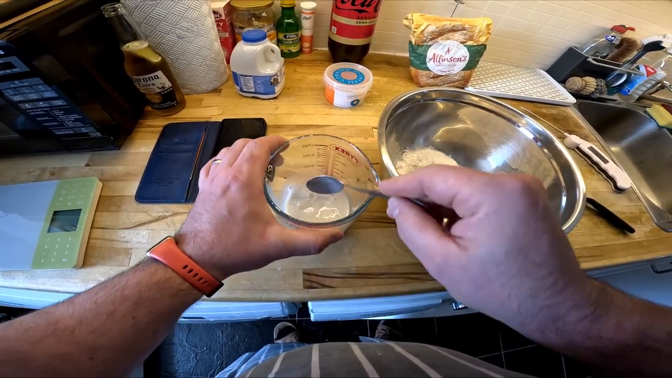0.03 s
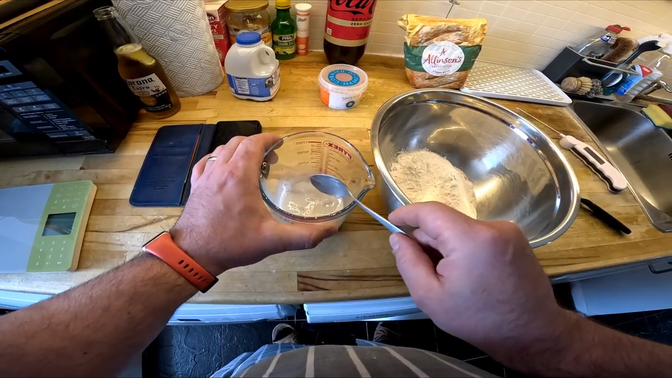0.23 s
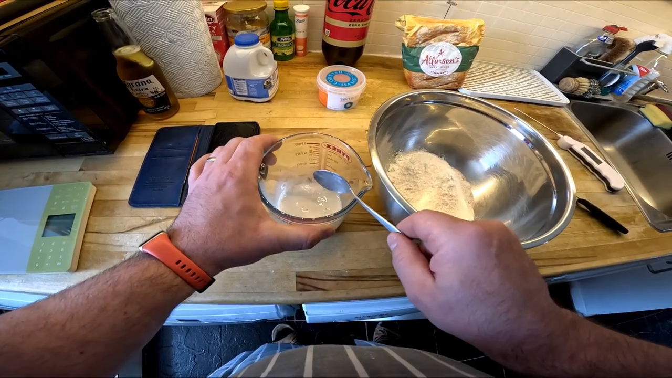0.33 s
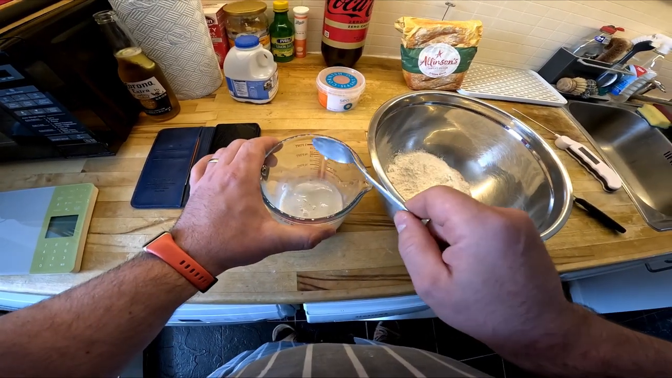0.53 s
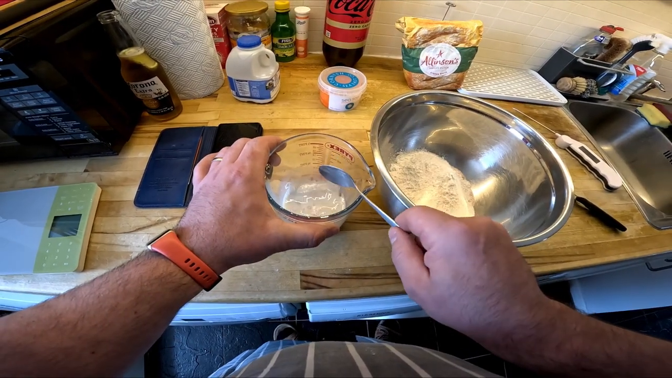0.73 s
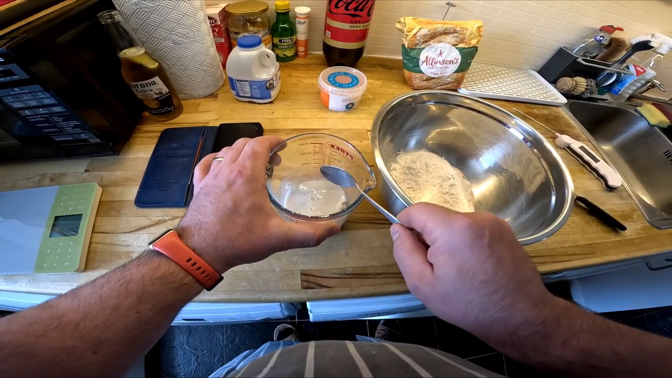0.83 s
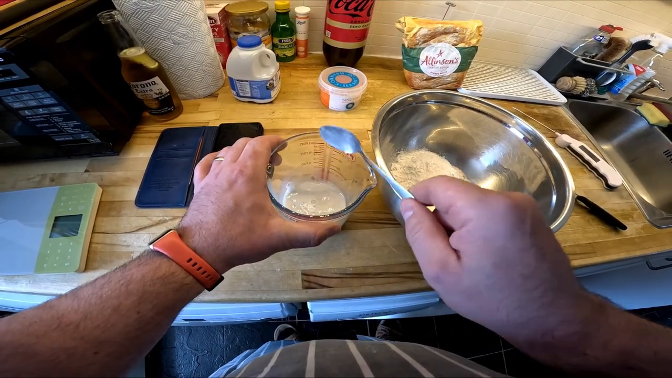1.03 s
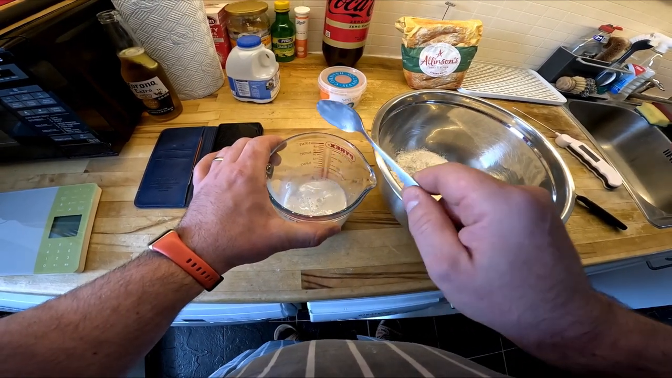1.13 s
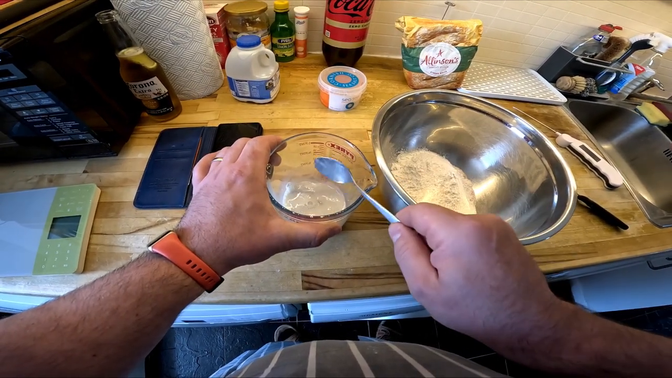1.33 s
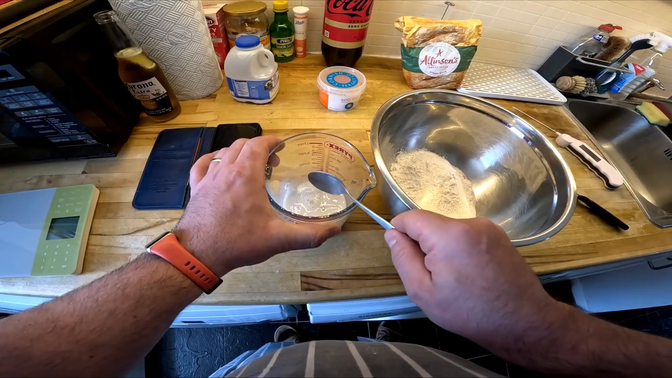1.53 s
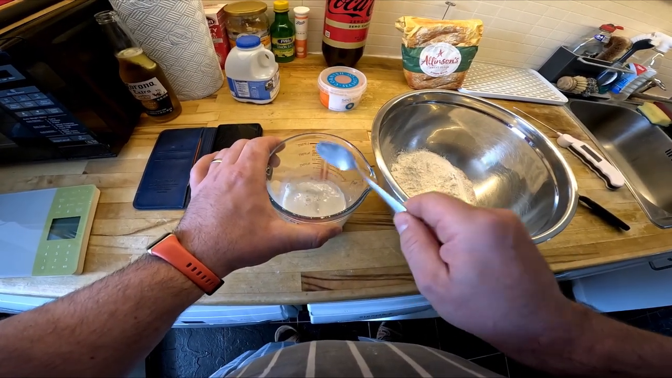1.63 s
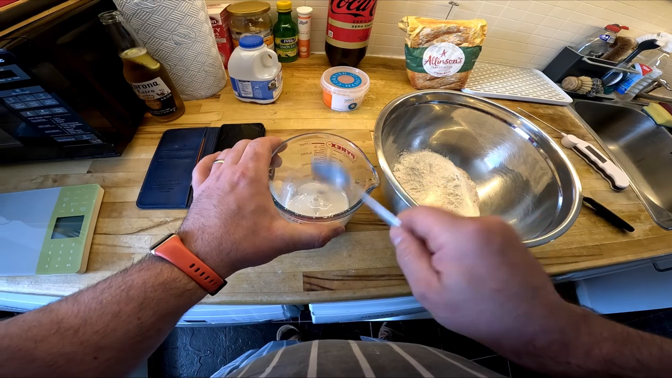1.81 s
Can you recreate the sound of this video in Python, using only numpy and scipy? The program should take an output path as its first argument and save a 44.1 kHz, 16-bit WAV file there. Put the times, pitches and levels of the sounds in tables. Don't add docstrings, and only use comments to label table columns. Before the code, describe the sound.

A steel spoon clinks against a handheld glass jug: one knock on the wall, a pause, a hard rim knock, then three quicker, softer taps, with dull counter thuds in a small kitchen, heard close.

```python
import sys
import numpy as np
from scipy import signal
from scipy.fft import rfft, irfft
from scipy.io import wavfile
from scipy.ndimage import uniform_filter1d

SR = 44100
rng = np.random.default_rng(int(sys.argv[2]) if len(sys.argv) > 2 else 0)


def put_to_file(sound):
    columns = np.atleast_2d(sound).T
    safe = np.clip(columns, -1, 1)
    whole_steps = np.round(safe * 32767)
    wavfile.write(sys.argv[1], SR, whole_steps.astype(np.int16))


def magnitude_from_level(level_db):
    exponent = np.asarray(level_db, float) / 20
    return 10 ** exponent


N = 83790

# (frequency [Hz], level [dB per Hz])
AIR_COLOUR = [(110, -32), (180, -4), (490, -12), (650, -23), (1120, -16.5), (4200, -34), (6300, -29.5),
              (9000, -45)]
RUSTLE_COLOUR = [(120, -37), (200, 5), (280, -21.5), (347, -9.5), (561, -30.5), (759, -18.5), (5170, -38.5),
                 (14000, -52)]
RUMBLE_COLOUR = [(15, -11), (35, -5), (50, -1), (62, -20.5), (100, -15.5), (300, -60)]
AIR_DB, RUSTLE_DB, RUMBLE_DB = -69, -57, -60
RUSTLE_END_S = 0.25
# (time [s], level [dB])
AIR_GATE = [(0, 4.5), (.45, 5.5), (.56, -0.5), (.76, -3), (.95, 2.5), (1.4, 0), (1.7, -6), (1.8, -5.5),
            (1.9, -2.5)]
# (time [s], level [dB])
HUM_LEVEL = [(0, -58), (.3, -70), (.4, -53), (.6, -59.5), (.7, -73), (1.0, -56), (1.15, -71.5), (1.35, -63),
             (1.9, -63.5)]
HUM_HZ, HUM_WIDTH_HZ = 154, 6

# (time [s], level [dB], frequency [Hz], length [ms], sharpness Q [1])
TICKS = [
    (.133, -49.5, 3330, 1.4, 0.63),
    (.152, -64, 11400, 1.4, 4.0),
    (.182, -48.5, 5930, 1.2, 2.6),
    (.436, -48, 4700, 4.7, 3.0),
    (0.436, -61.5, 7800, 8.8, 1.2),
    (.437, -41.5, 1207, 10, 7.2),
    (.495, -56.5, 11060, 0.74, 4.02),
    (.670, -62, 6500, 1.4, 4.3),
    (.748, -60, 7600, 1, 1.9),
    (.968, -48.5, 5470, 6.5, 4),
]
SCRAPE_HZ, SCRAPE_DB, SCRAPE_T60_S = 5150, -76.5, 0.78

# (time [s], level [dB], push [ms], deep modes [dB])
WALL_THUDS = [
    (0.189, -30.5, 8, -17),
    (.228, -21, 1.7, -0.5),
]
RIM_THUDS = [
    (.793, -21, 1.9, 2),
    (1.431, -31, 3.2, -4.5),
    (1.511, -26.5, 3.5, 1.5),
    (1.621, -27, 2.3, 0),
]
# (frequency [Hz], level [dB], t60 [s])
WALL_WOOD = [(95, -7.5, 0.35), (108.6, -12, 0.32), (149, -2.5, 0.063), (173, -8, 0.35), (182.4, 4.5, 0.089),
             (240.9, -10.5, .12), (333.5, -16, 0.17), (346, -12.5, 0.26), (513, -10.5, .08)]
RIM_WOOD = [(35.04, -3.5, 0.041), (93.5, -1, 0.16), (111.5, -10, 0.25), (136.4, -1.5, 0.11),
            (177, -3, 0.12), (251, -8.5, 0.13), (336, -4, 0.2), (345, -33, 0.45), (472, -14.5, 0.3),
            (794, -10.5, 0.06), (921, -21, .03), (60.5, -9.5, 0.11)]
DEEP_HZ = 130
# (frequency [Hz], level [dB per Hz])
RATTLE_COLOUR = [(60, -30), (150, 8), (250, -2), (500, -6), (1000, -11.5), (1400, -24.5), (3000, -27.5),
                 (8000, -62)]
RATTLE_DB, RATTLE_T60_S = -7.5, 0.27
# (time [s], level [dB])
BOWL = [
    (.905, -45.5),
    (1.72, -52.5),
]
BOWL_HZ, BOWL_RISE_S, BOWL_T60_S = 585, 0.015, 0.45

# (time [s], level [dB], low modes [dB], left-right [dB])
WALL_KNOCKS = [
    (.2233, -14, 2.5, 1.5),
    (0.2245, -4, -4, -1.5),
]
RIM_KNOCKS = [
    (0.7909, -2.5, -3, 0.67),
    (0.8085, -18.5, -2.5, 0.94),
]
RIM_TAPS = [
    (1.4272, -12, -1.5, 0.34),
    (1.5075, -11, 1, 0.41),
    (1.6190, -12.5, 3, 0.28),
]
# (frequency [Hz], level [dB], t60 [s])
WALL_MODES = [(937, -7, 0.0083), (2268, -15, 0.02), (3046, -13.5, 0.05), (3416, -2, 0.039),
              (4137, -11, 0.025), (4560, -1, 0.019), (5880, 4.5, 0.017), (6640, -6, 0.016),
              (6650, -11.5, 0.0094), (7340, -10.5, .025), (8574, -18.5, 0.017), (10925, -30, 0.03),
              (11500, -34, .015)]
RIM_MODES = [(893, -10, 0.016), (1698, -29, 0.027), (2334, -31, 0.04), (2940, -26.5, .03), (3380, 0, 0.014),
             (3840, -9, 0.022), (4614, -8, 0.024), (5106, -21.5, 0.036), (6510, -2, 0.012),
             (6670, 10, 0.009), (6975, 9, 0.0093), (7210, -10, 0.036), (9800, -12.5, 0.022),
             (11090, -13.5, 0.016)]
TAP_MODES = [(804, -14.5, 0.04), (1719, -24.5, 0.071), (2320, -24.5, 0.043), (2970, -22, 0.086),
             (3341, -10.5, 0.039), (3388, -7, 0.06), (3700, -17.5, 0.03), (4180, -7.5, 0.025),
             (4660, -10, 0.03), (5805, -10.5, 0.041), (6240, 4, 0.012), (6673, 6.5, 0.014),
             (7040, 4, 0.017), (7460, 2.5, 0.015)]
# (frequency [Hz], level [dB], t60 [s])
WALL_RING = [(5775, -33, .33), (5820, -30, .3), (1685, -31, .35), (3345, -30, .12), (3413, -36, .15),
             (4170, -30, .08), (6735, -40, .2), (5150, -26, .015), (10300, -24, .01), (1200, -26, .015),
             (3720, -18, .015), (12860, -34, .01), (14000, -36, .008), (7750, -14, .01)]
RIM_RING = [(1710, -42, 0.43), (3270, -42.5, 0.57), (4000, -11.5, 0.009), (5820, -35, 0.34),
            (6630, -43.5, .45), (7050, -35, 0.33), (8330, -17, .012), (1234, -17, 0.019),
            (10840, -11.5, 0.011), (7640, -27.5, 0.02), (12100, -33, 0.02), (12600, -24, 0.016),
            (14200, -31, .015), (14300, -26, .012)]
TAP_RING = [(1314, -19, 0.019), (4765, -11.5, .012), (945, -19.5, .015), (5835, -32.5, 0.38),
            (6570, -26.5, 0.24), (7200, -11.5, 0.014), (7900, -32, .02), (8170, -19.5, .012),
            (9670, -13.5, 0.02), (10270, -7, 0.0086), (10600, -42, 0.0064), (11200, -42.5, 0.015),
            (12900, -36.5, 0.011), (14100, -22.5, .012)]
# (lower edge [Hz], upper edge [Hz])
OPPOSED_HZ = (6050, 6520)
CONTACT_MS, CRACK_DB, SPLIT_HZ = 5.6, -24.5, 5000
WALL_RISE_MS, RIM_RISE_MS = 0.98, 0.83

ROOM_DB, LOW_ROOM_DB = -12, -10.5
ROOM_HIGH_DB, ROOM_T60_S, ROOM_HIGH_T60_S = -4, 0.37, 0.39
ROOM_ALIKE, ROOM_START_S = 0.92, 0.00033

AHEAD_DB = [-25, -36, -51.5, -67]
BLOCK_S, LEAK_TOP_HZ = 0.01067, 8600
# (time [s], level [dB])
LEAK_LEVEL = [(.2, -3.5), (0.799, 6.5), (1.441, 0), (1.47, -16)]
# (frequency [Hz], level [dB])
TONE = [(20, 0), (8300, 0), (8450, -10), (8800, -10), (8950, 0), (12000, 0), (14500, -8), (15300, -22),
        (16500, -36)]
# (frequency [Hz], left leads [rad])
PORT_RAD = [(20, 0), (400, -.15), (1000, -.7), (2150, -.8), (3300, -.7), (6630, -.65), (9000, -1.1),
            (14000, -1.4)]
# (frequency [Hz], left-right [dB])
PORT_DB = [(30, -3), (80, 1), (300, 0.5), (800, 1), (3000, 1), (6500, 2), (9000, 5.5), (14000, -2)]
LIMIT_KNEE_DB, LIMIT_SLOPE, LIMIT_RELEASE_S = -24, 0.24, 0.045


def table(points, hz):
    p = np.array(points)
    return np.interp(np.log(np.maximum(hz, 1)), np.log(p[:, 0]), p[:, 1])


def unit(x):
    return x / np.sqrt(np.mean(x ** 2))


def shaped(points, channels=1):
    hz = np.fft.rfftfreq(N, 1 / SR)
    white = rng.standard_normal((channels, N))
    return unit(irfft(rfft(white) * magnitude_from_level(table(points, hz)), N))


def add(out, x, s):
    i = int(s * SR)
    out[..., i:i + x.shape[-1]] += x[..., :N - i]


def ring(modes, split_hz, low_db, scatter_db, detune):
    t = np.arange(SR // 2) / SR
    hz, db, t60 = np.array(modes).T[:, :, None]
    chance = rng.standard_normal((len(modes), 2)).T[:, :, None]
    db = db + low_db * (hz < split_hz) + scatter_db * chance[0]
    sign = 1 - 2 * ((hz > OPPOSED_HZ[0]) & (hz < OPPOSED_HZ[1]))
    wave = np.sin(2 * np.pi * hz * (1 + detune * chance[1]) * t)
    return np.sum(sign * magnitude_from_level(db - 60 * t / t60) * wave, axis=0)


def kitchen():
    t = np.arange(N) / SR
    side = np.array([[1], [-1]])
    air, stir, deep = [shaped(colour, channels=2) for colour in (AIR_COLOUR, RUSTLE_COLOUR, RUMBLE_COLOUR)]
    air = magnitude_from_level(AIR_DB + np.interp(t, *np.array(AIR_GATE).T)) * (air[0] + 0.45 * side * air[1])
    fade = 1 / (1 + (t / RUSTLE_END_S) ** 4)
    rustle = magnitude_from_level(RUSTLE_DB) * fade * (stir[0] + 1.1 * side * stir[1])
    rumble = magnitude_from_level(RUMBLE_DB) * (deep[0] + 0.5 * side * deep[1])
    drift = unit(uniform_filter1d(rng.standard_normal(N), SR // 12))
    phase = 2 * np.pi * np.cumsum(HUM_HZ + HUM_WIDTH_HZ / 2 * drift) / SR
    hum = np.sqrt(2) * np.sin(phase) * magnitude_from_level(np.interp(t, *np.array(HUM_LEVEL).T))
    return air + rustle + rumble + hum


def ticks():
    out = np.zeros(N)
    t_ms = np.arange(SR // 20) / SR * 1000
    for s, db, hz, ms, sharp in TICKS:
        envelope = t_ms / ms * np.exp(-2 * t_ms / ms)
        burst = rng.standard_normal(len(t_ms)) * envelope * 5 * np.sqrt(sharp)
        b, a = signal.iirpeak(hz, sharp, fs=SR)
        add(out, magnitude_from_level(db) * signal.lfilter(b, a, signal.lfilter(b, a, burst)), s)
    b, a = signal.iirpeak(SCRAPE_HZ, 60, fs=SR)
    whine = unit(signal.lfilter(b, a, rng.standard_normal(N)))
    return out + whine * magnitude_from_level(SCRAPE_DB - 60 * np.arange(N) / SR / SCRAPE_T60_S)


def counter():
    out = np.zeros(N)
    t = np.arange(SR // 2) / SR
    for modes, thuds in ((WALL_WOOD, WALL_THUDS), (RIM_WOOD, RIM_THUDS)):
        rattle = shaped(RATTLE_COLOUR, channels=len(thuds))[:, :len(t)]
        rattle = rattle * magnitude_from_level(RATTLE_DB - 60 * t / RATTLE_T60_S)
        for (s, db, push_ms, deep_db), shake in zip(thuds, rattle):
            push = 1 - np.exp(-t * 1000 / push_ms)
            wood = (ring(modes, DEEP_HZ, deep_db, 1.4, 0.011) + shake) * push
            add(out, magnitude_from_level(db) * wood, s)
    return out + bowl()


def bowl():
    out = np.zeros(N)
    t = np.arange(SR // 2) / SR
    swell = (1 - np.exp(-t / BOWL_RISE_S)) ** 2
    for s, db in BOWL:
        add(out, magnitude_from_level(db - 60 * t / BOWL_T60_S) * swell * np.sin(2 * np.pi * BOWL_HZ * t), s)
    return out


def clinks():
    out = np.zeros((2, N))
    t = np.arange(SR // 80) / SR * 1000 / CONTACT_MS
    for modes, weak, knocks, rise_ms in ((WALL_MODES, WALL_RING, WALL_KNOCKS, WALL_RISE_MS),
                                         (RIM_MODES, RIM_RING, RIM_KNOCKS, RIM_RISE_MS),
                                         (TAP_MODES, TAP_RING, RIM_TAPS, RIM_RISE_MS)):
        for s, db, low_db, pan_db in knocks:
            body = ring(modes, SPLIT_HZ, low_db, 1.0, 0.0016) + ring(weak, SPLIT_HZ, low_db, 1.7, 0.0005)
            t_ms = np.arange(len(body)) / SR * 1000
            body = body * (1 - np.exp(-(t_ms / rise_ms) ** 2))
            crack = unit(t * np.exp(-2 * t) * rng.standard_normal(len(t)))
            add(body, magnitude_from_level(CRACK_DB) * crack, 0)
            pan = magnitude_from_level(np.array([[pan_db], [-pan_db]]) / 2)
            add(out, magnitude_from_level(db) * body * pan, s)
    return out


def room(x):
    t = np.arange(SR // 2) / SR
    noise = rng.standard_normal((2, len(t)))
    low = signal.sosfilt(signal.butter(2, 5200, fs=SR, output="sos"), noise)
    high = noise - low
    tail = low * magnitude_from_level(-60 * t / ROOM_T60_S) + high * magnitude_from_level(ROOM_HIGH_DB - 60 * t / ROOM_HIGH_T60_S)
    tail = tail * np.clip(t / ROOM_START_S - 1, 0, 1)
    side = np.array([[1], [-1]])
    tail = np.sqrt(1 + ROOM_ALIKE) * tail[0] + np.sqrt(1 - ROOM_ALIKE) * tail[1] * side
    tail = tail / np.sqrt(np.sum(tail[0] ** 2))
    return signal.fftconvolve(x[None], tail, axes=1)[:, :N]


def limiter(x):
    keep = np.exp(-1 / (LIMIT_RELEASE_S * SR))
    power = signal.lfilter([1 - keep], [1, -keep], np.mean(x ** 2, axis=0))
    return x * (1 + power / magnitude_from_level(2 * LIMIT_KNEE_DB)) ** -LIMIT_SLOPE


def scene():
    glass = clinks() + ticks()
    wood = counter()
    send = magnitude_from_level(ROOM_DB) * glass.mean(axis=0) + magnitude_from_level(LOW_ROOM_DB) * wood
    return glass + wood + room(send) + kitchen()


def band_limit(x):
    return signal.sosfilt(signal.butter(12, 15800, fs=SR, output="sos"), x)


def record(dry):
    hz = np.fft.rfftfreq(N, 1 / SR)
    half = magnitude_from_level(table(PORT_DB, hz) / 2) * np.exp(0.5j * table(PORT_RAD, hz))
    ports = np.array([half, 1 / half])
    dull = 1 / (1 + (hz / LEAK_TOP_HZ) ** 4)
    leak = dull * sum(magnitude_from_level(db) * np.exp(2j * np.pi * hz * BLOCK_S * (k + 1)) for k, db in enumerate(AHEAD_DB))
    leaky = dry * magnitude_from_level(np.interp(np.arange(N) / SR, *np.array(LEAK_LEVEL).T))
    x = irfft((rfft(dry) + rfft(leaky) * leak) * ports * magnitude_from_level(table(TONE, hz)), N)
    mix = np.clip(limiter(x), -1, 1)
    return band_limit(mix)


dry = scene()
out = record(dry)
put_to_file(out)
```